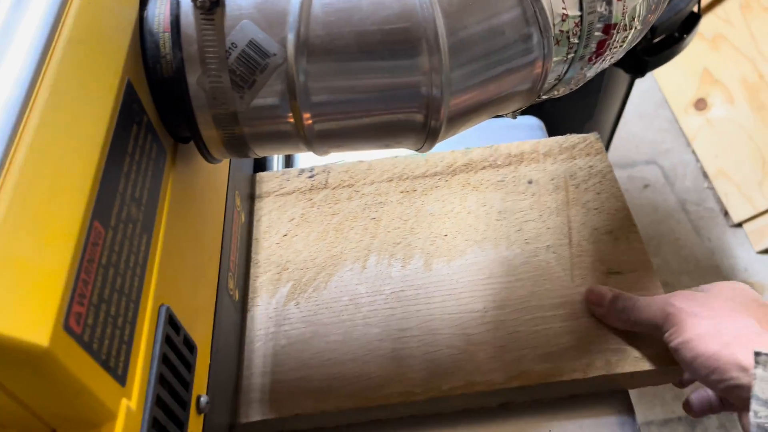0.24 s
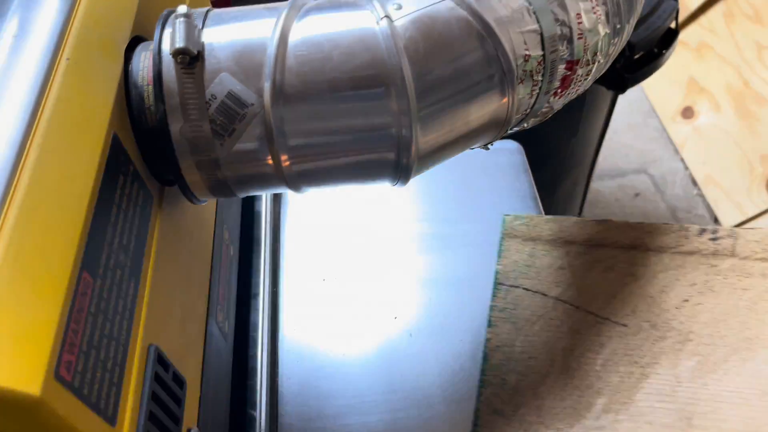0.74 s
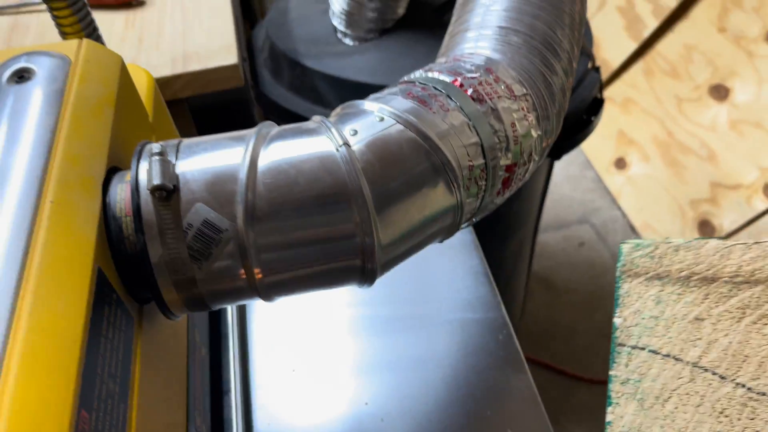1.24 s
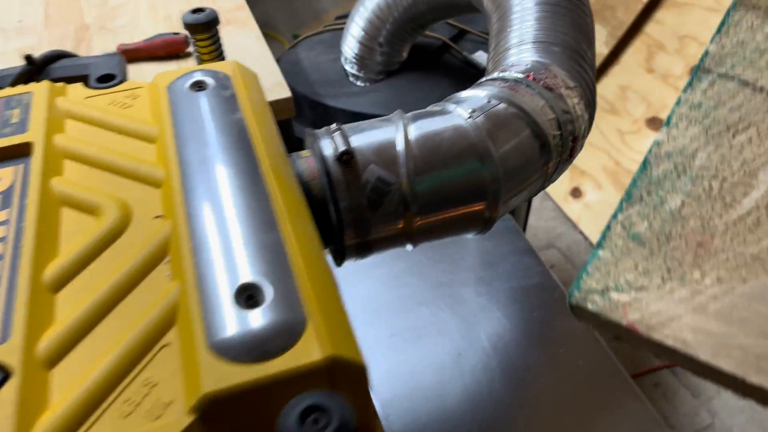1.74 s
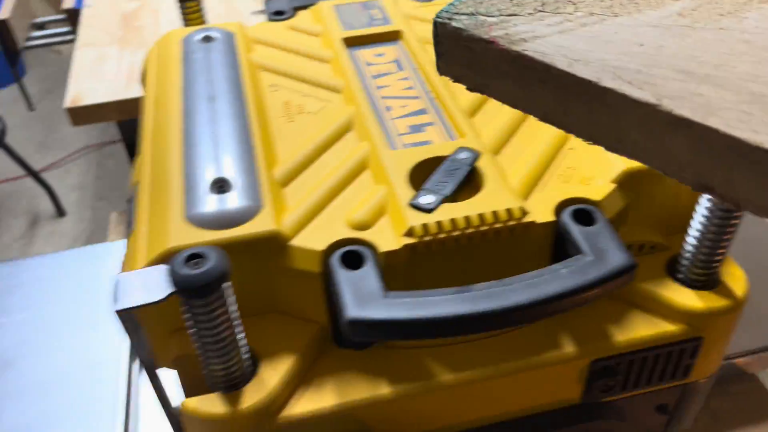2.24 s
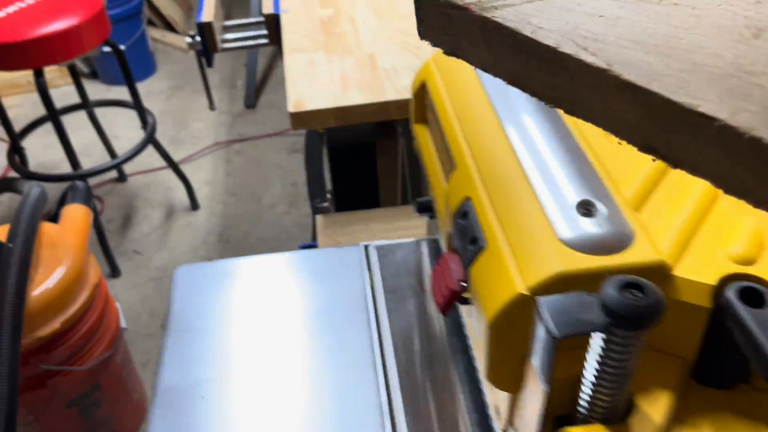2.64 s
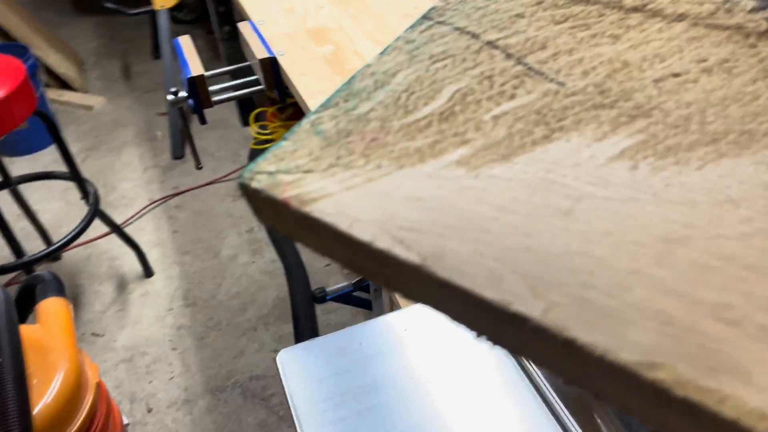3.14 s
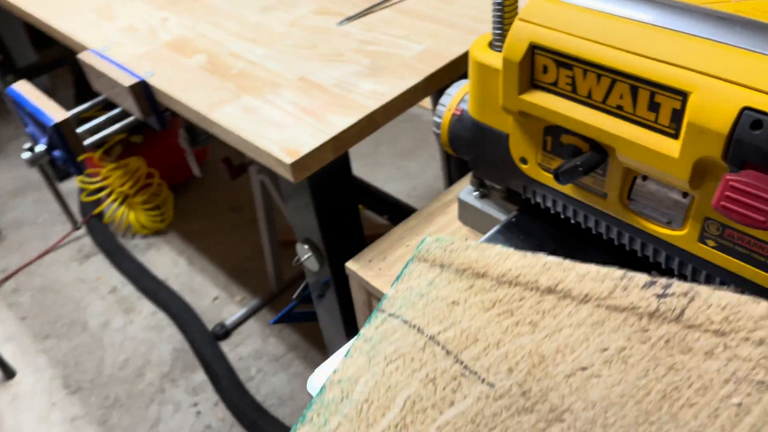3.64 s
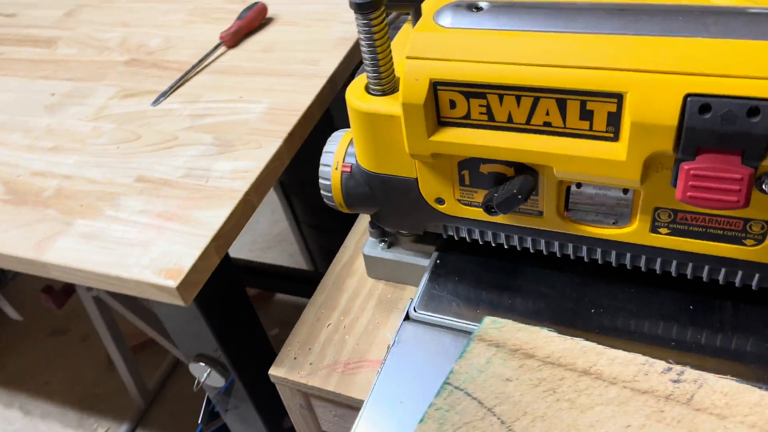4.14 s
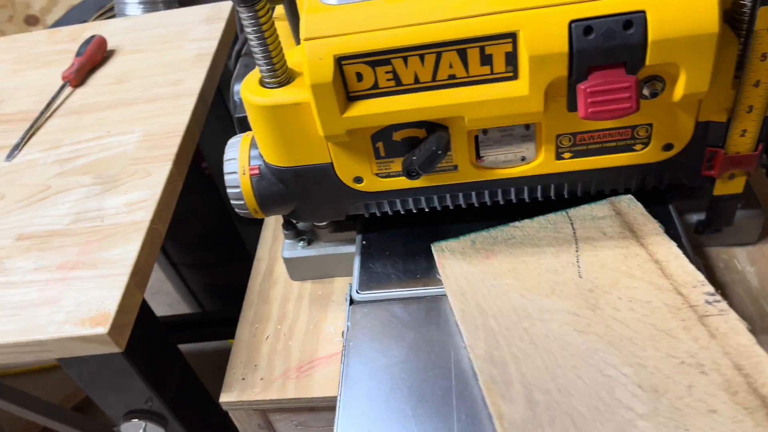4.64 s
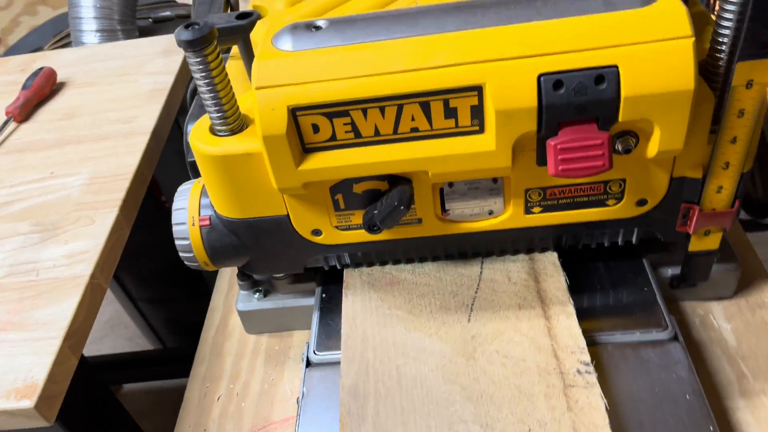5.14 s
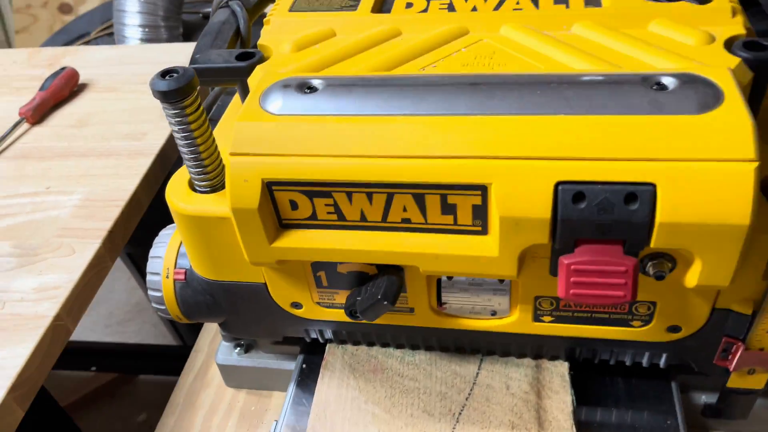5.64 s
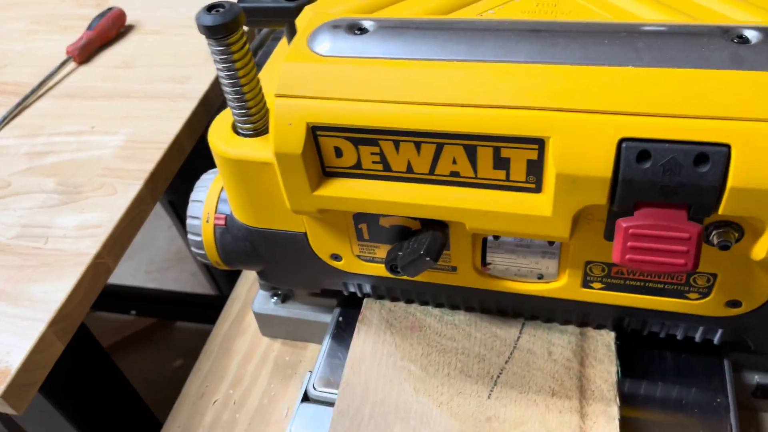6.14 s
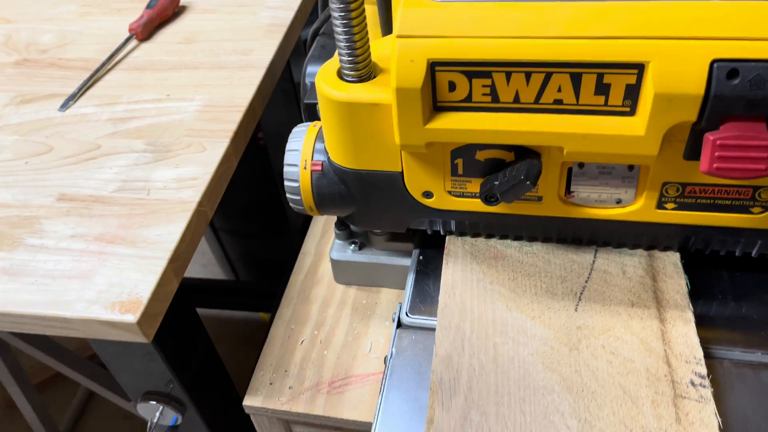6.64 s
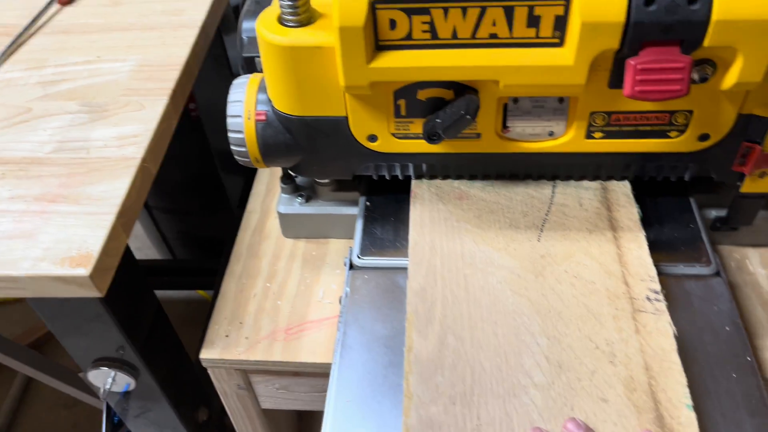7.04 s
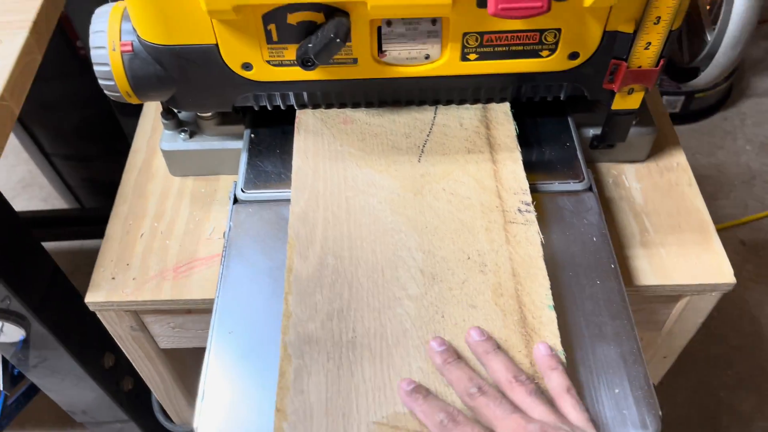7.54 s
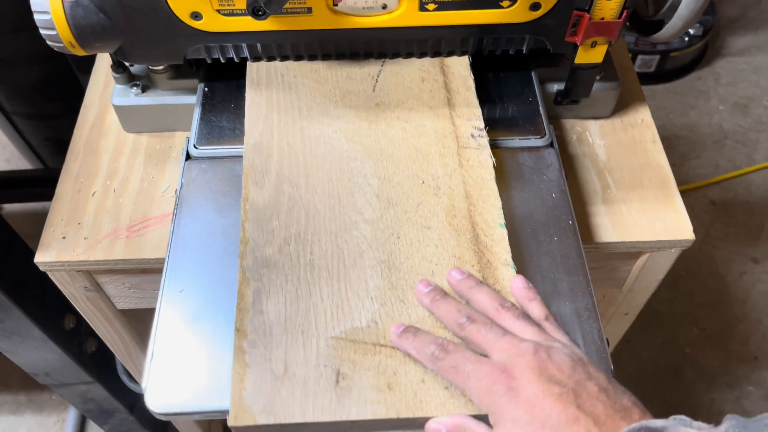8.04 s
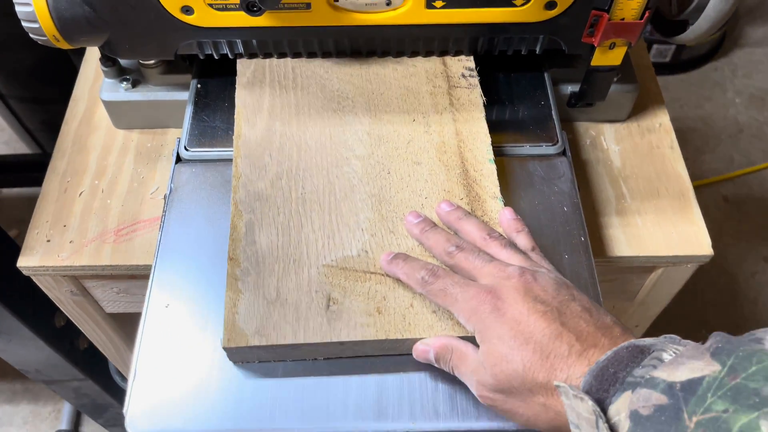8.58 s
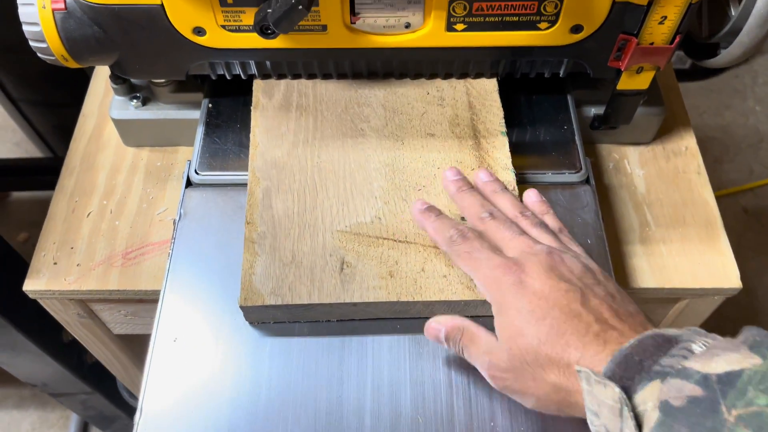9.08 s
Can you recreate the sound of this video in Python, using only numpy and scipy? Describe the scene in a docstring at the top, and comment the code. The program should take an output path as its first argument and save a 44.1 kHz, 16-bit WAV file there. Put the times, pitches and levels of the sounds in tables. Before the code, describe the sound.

A thickness planer is already running at full speed in a workshop, heard close on a moving handheld stereo microphone. From 0 to 1 second, near the metal dust duct, a solid drone near 450 hertz leans left, with full airy blower roar and a thin, very high motor whine. From about 1 to 2.4 seconds the microphone goes round the machine; the drone weakens and wavers, the whine fades and rumble thins. Around 2.5 to 3.7 seconds the hum swells and dips between sides. From 3.8 seconds, at the infeed table, the sound is fuller and slightly louder, with rough beating and shifting resonances in the hiss through 6 seconds. From 6 to 9 it holds steadier, pitch creeping up imperceptibly, with a tiny bright tick near 7.9. At roughly 9.24 the knives touch the board: a rapid, bright, woody rattle begins, cut off at 9.3.

```python
"""In a workshop a thickness planer idles while the microphone walks from the chip duct round to the infeed table.
A brush motor turns a three-knife cutter through a belt: both are sums of sines locked to the shaft angles,
and neighbouring tones beat. Level tables carry the swells and fades of the room's standing waves.
Fan and chip blower are filtered noise; at the very end the knives touch a board, ticks exciting resonators."""
import sys
import numpy as np
from scipy import signal
from scipy.io import wavfile
from scipy.ndimage import uniform_filter1d

SR = 44100
rng = np.random.default_rng(int(sys.argv[2]) if len(sys.argv) > 2 else 0)


def put_to_file(sound):
    """Save the sound as 16-bit audio at rate SR, in the file named by the first command-line argument."""
    columns = np.atleast_2d(sound).T  # one column per channel
    safe = np.clip(columns, -1, 1)
    whole_steps = np.round(safe * 32767)
    wavfile.write(sys.argv[1], SR, whole_steps.astype(np.int16))


N = 410571

# cutter speed, creeping up and sagging as the rollers take the board: t/s, speed/(turns per s)
CUTTER_SPEED = [(0, 149.62), (0.8, 149.99), (1.2, 150.14), (1.65, 150.24), (2.1, 150.17), (2.35, 150.26),
                (2.75, 150.35), (3.3, 150.37), (3.75, 150.56), (4.2, 150.59), (4.95, 150.72), (5.2, 150.84),
                (5.5, 150.88), (6.65, 150.84), (7.05, 150.95), (8.1, 151.06), (8.6, 151.08), (9.05, 150.87),
                (9.31, 150.96)]
BELT_RATIO = 1.95  # motor turns per cutter turn
# phase between the ports, a full turn across the top band: f/Hz, left lead/turns
PORT_PHASE = [(8800, 0), (9750, -.49), (10350, -.51), (11800, -1)]
TOP_BAND_HZ = PORT_PHASE[0][0]


def amp(db):
    """Level to amplitude ratio: 20 dB is a factor of ten."""
    return 10 ** (np.asarray(db) / 20)


def in_time(rows, t):
    """Linear interpolation of a table's columns at times t."""
    s, *columns = np.transpose(rows)
    return [np.interp(t, s, c) for c in columns]


def at_hz(points, hz):
    """Spectrum interpolated along a logarithmic frequency axis."""
    p = np.array(points)
    return np.interp(np.log(hz + 1), np.log(p[:, 0]), p[:, 1])


def bump(x, centre, width):
    """Gaussian of unit height; width is its standard deviation."""
    return np.exp(-.5 * ((x - centre) / width) ** 2)


def smooth_chance(shape, sizes):
    """Correlated random field: white noise averaged twice along each axis, standard deviation 1."""
    field = rng.standard_normal(shape)
    for axis, size in enumerate(sizes):
        for _ in range(2):
            field = uniform_filter1d(field, size, axis=axis)
    return field / field.std()


def walked(places):
    """Piecewise-linear path: a row holds while the microphone lingers at its place and glides between."""
    # chip duct, corner of the machine, infeed table, over the board: arrival t/s, departure t/s
    stops = [(0, 1.07), (2.4, 3.73), (3.8, 5.4), (8.4, 9.31)]
    return [(s, *row) for stop, row in zip(stops, places) for s in stop]


def swell(hz):
    """Standing-wave gain of one tone: it swells where the microphone crosses a crest."""
    # centre t/s, standard deviation/s, tone f/Hz, gain/dB
    crests = [(4.6, 0.19, 2710, 10.5), (2.9, 0.12, 2710, 5), (8.1, 0.39, 2710, 7)]
    t = np.arange(0, N, 100) / SR
    near = [row for row in crests if abs(np.log(row[2] / hz)) < .07]
    gain_db = sum((db * bump(t, s, length) for s, length, _, db in near), 0 * t)
    return np.interp(np.arange(N) / SR, t, amp(gain_db))


def tone(angle, rows, waver_db=0.96, fade_db=0):
    """Sine at two ports, amplitude-modulated by a waver in common and a slower fade at each port."""
    # levels and phase are set every 10 samples, the random modulation every 100
    left_db, right_db, lead = in_time(rows, np.arange(0, N, 10) / SR)
    steps = N // 100 + 2
    waver = waver_db * smooth_chance(steps, [25])
    left_slow, right_slow = [waver + fade_db * smooth_chance(steps, [120]) for port in "lr"]

    def read(slow):
        """Linear interpolation of the modulation at the control instants."""
        return np.interp(np.arange(len(lead)) / 10, np.arange(steps), slow)

    controls = [amp(left_db + read(left_slow)), amp(right_db + read(right_slow)), lead]
    left, right, lead = np.repeat(controls, 10, axis=1)[:, :N]
    angle, lead = np.float32(angle % (2 * np.pi)), np.float32(lead)
    # sqrt(2) makes the levels RMS
    return np.sqrt(2) * np.array([left * np.cos(angle + lead), right * np.cos(angle)])


def shafts():
    """Phase as the integral of frequency: angles of cutter, belt-driven motor and 120 Hz mains buzz."""
    t = np.arange(N) / SR
    cutter = 2 * np.pi * np.cumsum(in_time(CUTTER_SPEED, t)[0]) / SR
    return cutter, BELT_RATIO * cutter, 2 * np.pi * 120 * t


def air_rush(cutter, mains, ripple_db=2.0, comb_db=1.58, flicker_db=1.1, knife_pulse=0.066, brush_pulse=0.021):
    """Turbulence as coloured noise, partly coherent between the ports, shaped as the microphone moves."""
    # base spectrum: f/Hz, level/dB per Hz
    base_spectrum = [(40, -88), (85, -75.5), (160, -68), (225, -63), (300, -64), (770, -60), (1400, -64),
                     (2300, -72.5), (4500, -78.5), (6500, -81), (8700, -86), (9400, -80.5), (11000, -79),
                     (12300, -86.5)]
    # duct and housing resonances, peaks and dips: f/Hz, standard deviation/Hz, gain/dB
    resonances = [(457, 11, 4.5), (550, 33, 2.5), (777, 17, 4), (1125, 29, -3.5), (1560, 51, -2.5),
                  (3040, 23, -2.5), (3370, 96, -3), (4210, 730, 2.5), (7000, 86, -5.5), (7980, 100, 2.5)]
    # bands that brighten for a while: centre t/s, standard deviation/s, f/Hz, standard deviation/Hz, gain/dB
    glints = [(1.0, 0.29, 3750, 320, 5), (4.2, 1.5, 2940, 48, 8), (4.1, 0.18, 4460, 220, 8),
              (4.38, 0.22, 4300, 190, 6), (1.9, 0.74, 2300, 82, 1.5), (5.8, 0.7, 2850, 22, 0),
              (6.3, 0.7, 3660, 70, 2), (4.45, 0.35, 1500, 180, 6.5), (4.7, 2.3, 423, 20, 9.5),
              (5.7, 0.35, 3190, 38, 15), (5.4, 0.8, 812, 7.8, 14.5), (5.6, 0.84, 5180, 160, 4.5),
              (5.36, 0.35, 4255, 36, 10.5), (6.6, 0.4, 4255, 33, 8), (5.76, 0.19, 990, 27, 6),
              (9.5, 2.5, 1487, 25, 8.5), (4.95, 0.03, 45, 30, 9), (0.96, 0.55, 2450, 87, 3.5),
              (0.8, 0.7, 3100, 100, 3), (1.3, 0.45, 2080, 27, 4), (1.15, 0.5, 4694, 35, 7),
              (2.2, 1.1, 6050, 49, 8), (3.8, 0.5, 3230, 35, 5), (4.1, 0.45, 5405, 40, 5),
              (4.05, 0.5, 5728, 40, 6), (8.1, 0.9, 5728, 35, 5), (5.9, 1.2, 4800, 50, 4),
              (7.9, 0.55, 5100, 80, 5), (5.95, 0.4, 2864, 25, 5), (9.3, 0.25, 3000, 130, 6),
              (9.1, 0.3, 2110, 30, 8), (3.54, 0.3, 1100, 300, 2), (7.9, 0.54, 110, 27, 5),
              (7.935, 0.012, 9600, 740, 17)]
    # share of noise power common to both ports: f/Hz, share (0-1)
    coherence = [(60, 1), (250, 0.96), (500, 0.62), (1000, 0.3), (2000, 0.38), (4000, 0.3), (7500, 0.1),
                 (8800, 0.7), (10000, 0.97), (11500, 0.98), (12000, 0.98)]
    # one row a place: level/dB, rumble/dB, body/dB, hiss/dB, left lean/dB, left lead/ms
    rush_places = [(-0.5, 0, 3, 4, 2.5, 0.42), (-0.4, -4, -1, -0.2, 2.5, 0.089),
                   (-0.1, 2.5, 0.3, 1.4, 0.6, 0.072), (0.47, 2.5, -0.9, -0.7, 2, 0.069)]

    hz, t, white = signal.stft(rng.standard_normal((3, N)), SR, nperseg=2048)
    level_db, rumble_db, body_db, hiss_db, lean_db, lead_ms = in_time(walked(rush_places), t)
    f = hz[:, None] + 1
    grid = (len(hz), len(t))
    below_top = f < TOP_BAND_HZ

    db = at_hz(base_spectrum, f) + level_db
    db = db + rumble_db / (1 + (f / 130) ** 4) + hiss_db / (1 + (4000 / f) ** 4)
    db = db + body_db * bump(np.log2(f), 9.62, 0.55)  # octaves: centred near 790 Hz
    db = db + sum(gain_db * bump(f, c, w) for c, w, gain_db in resonances)
    db = db + sum(gain_db * bump(t, s, length) * bump(f, c, w) for s, length, c, w, gain_db in glints)
    db = db + flicker_db * smooth_chance(grid, [20, 2])  # gusts, broad and quick
    db = db + comb_db * smooth_chance(grid, [2, 24]) * below_top  # narrow room peaks common to both ports

    # the delay between the ports acts below 4 kHz
    lead = 2 * np.pi * (at_hz(PORT_PHASE, f) + f * lead_ms / 1000 * (f < 4000))
    alike = np.clip(at_hz(coherence, f), 0, 1)
    ports = []
    for k, side in enumerate([1, -1]):
        # standing waves: a fine, slowly shifting ripple, independent where the ports are incoherent
        ripple = ripple_db * smooth_chance(grid, [3, 30]) * np.sqrt(1 - alike)
        common = np.sqrt(alike) * white[2] * np.exp(.5j * side * lead)
        mixed = common + np.sqrt(1 - alike) * white[k]
        ports.append(mixed * amp(db + ripple + side * lean_db / 2 * below_top))
    # unit-variance noise has density 2/SR, so this scales it to 1 per Hz
    rush = signal.istft(np.array(ports), SR, nperseg=2048)[1][:, :N] * np.sqrt(SR / 2)
    return rush * (1 + knife_pulse * np.cos(3 * cutter) + brush_pulse * np.cos(mains))


def bite(cutter, tear=0.088):
    """Impulse excitation: knives tick the board's end, torn fibres add noise; board and table resonate."""
    # modes of board and table: f/Hz, bandwidth/Hz, relative level/dB
    board_modes = [(2650, 200, 6), (3400, 290, 8), (4980, 110, 3), (6400, 200, -5), (7800, 400, -11),
                   (10900, 460, -9)]
    start_s, rise_s, level_db = 9.236, 0.04, -29

    start = int(start_s * SR)
    ticks = np.diff(np.floor(3 * cutter[start - 1:] / (2 * np.pi)))  # 1 at each knife passage
    strikes = ticks * amp(rng.normal(0, 1.5, len(ticks))) + tear * rng.standard_normal((2, len(ticks)))
    rung = 0
    for hz, width, db in board_modes:
        r = np.exp(-np.pi * width / SR)  # pole radius
        poles = [1, -2 * r * np.cos(2 * np.pi * hz / SR), r * r]
        rung = rung + amp(db) * signal.lfilter([1 - r * r, 0, r * r - 1], poles, strikes)
    rise = np.clip(np.arange(len(ticks)) / SR / rise_s, 0, 1)
    return np.pad(amp(level_db) * rise * rung / rung.std(), ((0, 0), (start, 0)))


def motor(cutter, rotor, mains):
    """Beats and modulation: rotor tones beat with the cutter, and the mains pulse the commutator whine."""
    # beating tones: t/s, left level/dB, right level/dB, left lead/rad, phase ahead of 2, 3, 4 cutter turns/rad
    rotor_beat = [(0.05, -36, -39.7, -0.1, 2.2), (0.25, -38, -41.5, -0.1, 1.6), (0.65, -39, -42, -0.7, 3.4),
                  (1.05, -40, -42.8, -1.2, 4.7), (1.35, -35.5, -46, -0.8, 3.8), (2.4, -32.0, -32, 0.1, 2.9),
                  (2.65, -32, -29, 0.1, 2.7), (2.9, -31.1, -27.0, 0.2, 3.3), (3.5, -36, -30, -0.2, 3.4),
                  (3.8, -32.0, -28.4, -0.1, 4.1), (4.15, -34, -29.5, 0.1, 4.4), (5.0, -32.5, -28, 0.1, 4.5),
                  (5.4, -35, -29.2, 0.1, 4.6), (5.8, -29, -27, 0.2, 4.9), (5.95, -33.8, -28.9, 0.2, 5.3),
                  (6.3, -35.5, -30, 0.2, 4.0), (7.1, -34.1, -30, 0.1, 4.7), (8.0, -33, -30.3, 0.1, 4.2),
                  (8.15, -33, -30.5, 0.2, 4.4), (8.55, -33, -29.8, 0.1, 4.6), (8.7, -37, -33.2, 0.2, 4.7),
                  (9.25, -37, -33.5, 0.2, 4.5)]  # motor turn, against twice the cutter
    knife_beat = [(0.05, -30.1, -36.4, 2.7, 2.2), (0.1, -38.7, -36.5, 1.7, 2.4), (0.3, -43, -41.2, 5, 1.4),
                  (0.45, -33, -33.6, 1, 2.6), (0.75, -46, -43.5, 2.5, 1.9), (1.0, -38.1, -36.5, 1.5, 2.0),
                  (1.65, -38.5, -51.0, 3.0, 2.9), (1.8, -42.7, -41.7, -0.1, 6.3),
                  (1.9, -44.7, -39.1, 1, 5.5), (2.25, -53.0, -39.6, 3.0, 3.8), (2.55, -40, -48.7, 6.2, 4.0),
                  (2.75, -37.8, -43.8, 5, 5.6), (2.95, -31, -33, -0.5, 11.8), (3.2, -33, -48.3, 4.5, 7.1),
                  (3.3, -33.2, -35.6, 6, 5.3), (3.45, -31.6, -28, 7, 5.4), (3.55, -31, -28, 6.2, 5.6),
                  (3.65, -29, -27, 6.5, 5.4), (3.75, -30, -26, 6, 3.4), (3.95, -34, -30.2, 6.5, 2.6),
                  (4.15, -32.6, -27, 6, 2.6), (4.3, -39.2, -33.9, 6.9, 2.2), (4.8, -28, -24, 6.5, 2.5),
                  (4.95, -43.1, -37.0, 7.1, 2.6), (5.2, -32.8, -30.2, 6.5, 3.2),
                  (5.5, -34.6, -33.4, 6.5, 3.4), (5.65, -27, -27, 7, 4.1), (5.7, -26, -24, 6.7, 4.4),
                  (5.8, -33.8, -31.6, 6.5, 3.2), (5.9, -30.6, -30.1, 9, 4.7), (5.95, -28, -27, 5.5, 3.9),
                  (6.05, -35.4, -31, 7.5, 3.6), (6.15, -33.6, -32.2, 7, 5.2), (6.2, -35.9, -36.1, 6.1, 4.4),
                  (6.3, -32.9, -27, 6.4, 3.4), (6.55, -31, -33.4, 6, 3.5), (6.8, -32.5, -29.5, 7.5, 2.6),
                  (7.05, -40, -37, 7.3, 2.5), (7.4, -33.0, -28, 7.1, 2.8), (7.9, -37, -31.5, 7.1, 2.7),
                  (8.6, -41, -38, 6, 3.9), (8.75, -32.2, -30.2, 7.1, 3.6), (9.15, -37.3, -35.5, 7.0, 3.5),
                  (9.25, -30.6, -31.0, 7, 3.6)]  # motor plus cutter turn, against the knife tone
    upper_beat = [(0.05, -37.7, -42.1, 1, 2.0), (0.3, -36.5, -40.7, 0.5, 1.2), (0.6, -36, -44.1, 0.2, 2.9),
                  (1.05, -34.9, -47.2, -0.8, 3.2), (1.45, -35, -38.7, 0.1, 2.8),
                  (1.7, -36.0, -38.6, 0, 2.4), (2.05, -50.7, -45.8, -0.6, 3.3),
                  (2.45, -39.8, -41.4, -2.1, 2.9), (2.85, -37.8, -40.9, 0.4, 1.8),
                  (3.15, -39.0, -38.6, 1.2, 2.3), (3.5, -57.3, -43.5, 1, 1.7),
                  (3.95, -42.9, -44.0, 1.4, 3.1), (4.15, -41.7, -44.3, 1.3, 2.1),
                  (5.25, -46.1, -49.1, 1.6, 3.2), (5.55, -43.0, -41.2, 2.5, 2.3),
                  (5.7, -58.5, -53.4, 2.3, 4.3), (5.95, -48.7, -48.1, 2.3, 3.3),
                  (6.2, -48.7, -41.7, 2.7, 1.2), (6.75, -48.4, -46.5, 2.0, 3.1),
                  (7.6, -47.2, -47.3, 2.3, 1.7), (8.25, -41.2, -41.8, 2, 2.4), (9.25, -46.1, -54.0, 2, 2.8)]  # motor plus two cutter turns, against the fourth multiple
    # single tones: t/s, left level/dB, right level/dB, left lead/rad
    gear_hum = [(0.05, -47, -46, 0.7), (1.1, -51, -51, 0.8), (3.15, -45.6, -38, 0.1),
                (3.45, -51.8, -44.7, -0.1), (5.4, -49.6, -43.0, -0.1), (5.9, -62.5, -52.9, 0.7),
                (6.3, -53.4, -44.3, 0.1), (9.25, -62.2, -51, 0.7)]  # faint, just above twice the cutter, perhaps a feed-drive gear
    gear_order = 2.092  # cutter multiple
    fan_whine = [(0.0, -48, -53.5, 1.0), (0.35, -47, -57.0, 1.1), (0.5, -52, -62.0, 1.3),
                 (0.9, -51, -57, 2.9), (1.1, -44, -50, 4.1), (1.5, -54.0, -55, 4), (1.65, -46.5, -58, 6.9),
                 (1.85, -61, -64, 6.4), (2.05, -48, -46, 6.7), (2.15, -64, -64, 6.7),
                 (2.3, -53.0, -56.5, 6.8), (2.5, -64.0, -60, 6.8), (2.6, -44, -61.5, 6.8),
                 (2.7, -46, -61.5, 7.9), (3.1, -60, -67.5, 7.1), (3.4, -47, -57.5, 7.9),
                 (3.55, -60.5, -65.5, 7.9), (3.75, -51.0, -53.5, 7.7), (4.45, -55, -68.0, 7.1),
                 (4.9, -56.0, -61.5, 7.1), (5.0, -70, -68.0, 8), (5.4, -48, -56.5, 7.3),
                 (5.55, -67.0, -65.5, 7.7), (5.9, -45, -59, 7.7), (6.6, -62.0, -68.0, 8.6),
                 (6.75, -49, -68.0, 9.0), (7.1, -53, -56.0, 9.0), (7.25, -46, -65.0, 8.9),
                 (7.5, -54, -67.5, 8.8), (7.75, -57.5, -58.0, 9.9), (8.0, -47.5, -65.5, 8.9),
                 (8.3, -50, -68.0, 9.3), (8.5, -48, -55.0, 9), (9.3, -54, -66, 13)]
    brush_whine = [(0, -37, -38, -1.5), (.95, -38.5, -39.5, -1.8), (1.35, -44, -45, -1.9),
                   (1.55, -41, -41.5, -2), (1.9, -49, -50, -1.8), (2.6, -55, -55, -2), (4, -57, -62, -1.9),
                   (7, -62, -62, -2.5), (8.4, -56, -54, -2), (9.3, -57, -59, -3.5)]
    # rotor multiples that accompany the commutator whine, and their levels relative to it/dB
    rotor_orders, rotor_orders_db = [16, 28, 29, 31, 33, 35, 36, 38, 39, 40], [-16.5, -24, -27.5, -22, -22, -17, -13, -20, -15,
                                                           -25]
    # faint mixing tones and rotor multiples: cutter multiple, motor multiple, mains buzz multiple; level/dB
    mixes, mixes_db = [(0, 0, 1), (1, 0, 1), (0, 1, -1), (2, 0, -1), (0, 2, 0), (2, 0, 1), (0, 8, 0),
                       (0, 7, 0), (0, 3, 0), (3, 1, 0), (3, -1, 0), (0, 16, 0), (0, 16, 1), (0, 16, -1),
                       (0, 9, 0), (0, 5, 0), (0, 14, 0), (0, 15, 0), (21, 0, 0), (10, 0, 0), (0, 23, 0),
                       (3, 21, 0), (0, 33, 0), (0, 34, 0), (0, 35, 0), (0, 36, 0)], [-53, -46, -55.5, -54, -47.5, -46.5, -56, -65, -57, -47, -60.5, -59.5,
                                      -67, -69, -70, -57.5, -65, -63, -65, -53.5, -69.5, -68, -68, -70, -75,
                                      -66]
    sideband_db = -10.5

    t = np.arange(N) / SR
    cutter_hz = CUTTER_SPEED[0][1]
    out = tone(gear_order * cutter, gear_hum, waver_db=1.0)
    for turns, rows, waver_db in [(0, rotor_beat, 0.0), (1, knife_beat, 0.3), (2, upper_beat, 0.96)]:
        ahead = in_time(rows, t)[-1]
        out += tone(rotor + turns * cutter + ahead, [row[:-1] for row in rows], waver_db=waver_db)
    out += tone(21 * rotor, fan_whine, waver_db=2.5)  # 21 fan blades

    whine = tone(32 * rotor, brush_whine, waver_db=1.5)  # 32 commutator bars
    for k, db in zip(rotor_orders, rotor_orders_db):
        lead = 2 * np.pi * at_hz(PORT_PHASE, k * BELT_RATIO * cutter_hz)
        rows = [(s, left, right, lead) for s, left, right, _ in brush_whine]
        whine += amp(db) * tone(k * rotor, rows, waver_db=3.5)
    out += whine * (1 + 2 * amp(sideband_db) * np.cos(mains))  # sidebands one mains buzz away

    for (c, m, b), db in zip(mixes, mixes_db):
        # only high rotor multiples are out of phase between the ports
        lead = 2 * np.pi * at_hz(PORT_PHASE, (c + m * BELT_RATIO) * cutter_hz) * (m > 30)
        angle = c * cutter + m * rotor + b * mains + rng.uniform(0, 2 * np.pi)
        out += tone(angle, [(0, db, db, lead)], waver_db=3.5, fade_db=2.0)
    return out


def cutterhead(cutter):
    """Harmonic series: three knives chop the air, and unbalance adds the multiples of one turn."""
    # all along the walk: t/s, left level/dB, right level/dB, left lead/rad
    # the knife tone and its next four multiples
    knife_tones = [[(0.05, -17, -29, 2.5), (0.1, -15.7, -34.0, 2.7), (0.15, -15.5, -35.7, 2.1),
                    (0.2, -15, -35.0, 1.9), (0.35, -14.5, -31, 2.1), (0.4, -15, -30, 2.7),
                    (0.45, -16, -28, 2.5), (0.65, -18.5, -26.0, 2.5), (0.75, -16.5, -25, 3),
                    (0.9, -18.9, -24.2, 2.5), (1.25, -22.0, -30, 3.3), (1.4, -21.5, -31, 4.0),
                    (1.6, -22, -25.5, 4.5), (1.75, -23, -28.0, 4.4), (2.05, -22.5, -32.2, 2),
                    (2.3, -28, -26.5, 0), (2.6, -21, -21, -0.9), (2.85, -25.5, -18, 0.5),
                    (3.05, -28, -28, 3), (3.3, -20, -22.5, 3), (3.55, -18.5, -35.4, 3),
                    (3.6, -19, -38.6, 3.5), (3.7, -17, -38.6, 2.4), (3.75, -18.1, -38.1, 1.0),
                    (3.8, -17, -32.6, 0.7), (4.0, -18.1, -22.6, 0.5), (4.15, -17.5, -18, 0.8),
                    (4.35, -18, -18, 1.0), (4.8, -17, -17, 0.77), (5.0, -20, -20, 1.2),
                    (5.25, -18.9, -19.5, 1.0), (5.5, -18, -19.5, 1.5), (5.6, -23, -21.3, 2.2),
                    (5.75, -26, -19, 1.3), (5.8, -22, -16, 1.3), (5.9, -19, -19.5, 1.74),
                    (6.05, -28, -16.5, 1), (6.15, -16, -19.5, 1.6), (6.2, -18.9, -23, 2),
                    (6.3, -18.7, -20, 1.5), (6.6, -17, -20, 1.47), (7.1, -23, -18.8, 1.4),
                    (7.65, -18.5, -19.5, 1.0), (8.15, -21.0, -21.0, 1.23), (8.75, -18.5, -17.8, 1.0),
                    (9.25, -18.1, -20.7, 1.0)], [(0.05, -30.5, -31, 3.5), (0.55, -27.5, -27.5, 1.83),
                                    (1.1, -25.5, -30, 2.5), (1.45, -31.3, -38, 1.8), (1.65, -33.5, -42, -3),
                                    (1.8, -27.5, -35, -3.5), (2.1, -36, -45, -7), (2.15, -38, -51.6, -10.2),
                                    (2.35, -31, -33.2, -9.5), (2.65, -34.9, -41, -9), (3.0, -37, -31, -12),
                                    (3.3, -31, -30, -12), (3.5, -32, -37, -8.5), (3.7, -27.0, -28.9, -9.5),
                                    (4.0, -26, -27.2, -9.1), (4.15, -24.8, -37.4, -9),
                                    (4.25, -24.5, -37.7, -5.5), (4.4, -25.5, -27, -6.0),
                                    (4.95, -26.5, -30, -5.5), (5.25, -26.5, -32.8, -6.7),
                                    (5.5, -30, -28, -8.5), (5.85, -47, -39, -9.5), (6.4, -29, -33, -8.5),
                                    (6.75, -26.5, -31.9, -5.5), (7.15, -26.2, -28, -5),
                                    (7.5, -26.5, -34, -5), (7.95, -27.3, -37, -5), (8.7, -23, -41, -3.5),
                                    (9.1, -26.5, -38, -3.8), (9.25, -24.5, -42.1, -2)], [(0.05, -33.3, -49.0, 4), (0.2, -37, -50.9, 6),
                                                      (0.3, -33, -54, 4), (0.6, -42, -38, 5),
                                                      (1.3, -43, -48, -0.5), (1.5, -35.9, -50.0, 1.5),
                                                      (1.65, -39, -38.1, 1.3), (1.9, -45.0, -46.7, 0.5),
                                                      (2.1, -39, -40.7, -8.9), (2.2, -35, -45.2, -8.5),
                                                      (2.25, -37.3, -48.5, -7.5), (2.3, -36, -52.9, -6.5),
                                                      (2.75, -36, -38.9, -4), (3.0, -41.7, -34, -2),
                                                      (3.35, -30.5, -40, -2.2), (3.45, -30.5, -40.9, -1.7),
                                                      (3.9, -51.3, -51, -2), (4.0, -35, -33, -0.5),
                                                      (4.2, -30.9, -33, -1.3), (4.3, -33, -37.8, -0.8),
                                                      (4.45, -29.1, -31, -0.3), (4.8, -32.5, -34, -0.5),
                                                      (5.3, -28, -34.0, -0.5), (5.55, -29, -34, -1.2),
                                                      (5.95, -43, -32.1, -1.1), (6.4, -32, -33, -1.5),
                                                      (6.6, -30.3, -32, -0.8), (6.9, -34, -31.4, -0.7),
                                                      (7.5, -30.5, -34.4, -0.0), (8.25, -30, -33, -0.3),
                                                      (8.7, -24.5, -29.6, -0.7), (9.25, -31.9, -30, 0.3)], [(0.05, -39.1, -45.3, 1.6),
                                                                        (0.45, -41, -57.1, 3.9),
                                                                        (0.5, -37, -57.1, 1.6),
                                                                        (0.55, -36.9, -49.1, 2),
                                                                        (0.95, -38.4, -37, 1.5),
                                                                        (1.1, -34.6, -43, 2),
                                                                        (1.4, -37.5, -39, 1.3),
                                                                        (1.55, -39, -38.0, 3),
                                                                        (1.7, -40.4, -39.4, 2.0),
                                                                        (1.8, -46, -47, -0.5),
                                                                        (1.95, -37, -48.0, -1.2),
                                                                        (2.25, -49.4, -41.3, -10),
                                                                        (2.35, -37, -53.3, -10.9),
                                                                        (2.4, -38.5, -57.1, -8.5),
                                                                        (2.8, -54.5, -45, -8),
                                                                        (3.0, -35, -43.6, -7),
                                                                        (3.15, -42.0, -47.0, -7.5),
                                                                        (3.55, -47.4, -42, -9.5),
                                                                        (4.5, -38, -36.2, -7),
                                                                        (4.75, -41.0, -55, -6.3),
                                                                        (4.8, -45, -55.3, -3.3),
                                                                        (5.15, -43, -38.5, -1.7),
                                                                        (6.15, -39, -35, -1.5),
                                                                        (6.7, -39, -38.0, -1.7),
                                                                        (7.5, -38.5, -43, -0.3),
                                                                        (8.05, -47.5, -44, -3),
                                                                        (8.35, -37, -36, -0.5),
                                                                        (8.45, -36, -36.2, -0.1),
                                                                        (8.95, -33.5, -41.6, -0.3),
                                                                        (9.05, -35, -46.2, 0.6),
                                                                        (9.2, -30.4, -38.2, -0.6),
                                                                        (9.25, -31, -38.1, 0.5)], [(0.05, -63.4, -50.5, 3),
                                                                                          (0.85, -47, -40.5, 3),
                                                                                          (1.65, -49.3, -46, 1.2),
                                                                                          (1.75, -50.6, -50.8, -1.2),
                                                                                          (2.1, -46.8, -53.7, 5.1),
                                                                                          (2.25, -46.2, -53.9, 1.1),
                                                                                          (2.5, -46.7, -45.6, 2.6),
                                                                                          (2.7, -48.0, -43, -0.3),
                                                                                          (2.9, -51.4, -47.8, -3.3),
                                                                                          (3.1, -51.9, -57.7, -1.6),
                                                                                          (3.15, -46.0, -53.3, 0),
                                                                                          (3.25, -43.5, -42, 1.1),
                                                                                          (3.45, -52, -49, -0.1),
                                                                                          (4.1, -41, -47.7, -1.6),
                                                                                          (4.5, -44.1, -37, 0.5),
                                                                                          (4.95, -48.1, -46, 0.1),
                                                                                          (5.3, -55.1, -62.8, 5.1),
                                                                                          (5.55, -44.5, -47.6, 6),
                                                                                          (5.9, -42.6, -56.0, 3.4),
                                                                                          (6.3, -43, -58.3, 5.8),
                                                                                          (6.95, -52.7, -48.0, 8.7),
                                                                                          (8.05, -43.7, -50.8, 9.9),
                                                                                          (8.15, -47.0, -61.5, 10.2),
                                                                                          (8.2, -47.5, -56.3, 12.7),
                                                                                          (8.3, -46.0, -44.9, 13.1),
                                                                                          (8.8, -52, -49.7, 13.6),
                                                                                          (9.15, -37, -40.1, 13.0),
                                                                                          (9.25, -44, -42, 13.4)]]
    # second, fourth and fifth cutter multiples
    cutter_second, cutter_fourth, cutter_fifth = [(0.05, -37.8, -45, -0.4), (0.15, -41.9, -43.2, -0.8),
                                                  (0.3, -37.8, -37.5, -0.3), (0.85, -39, -39.9, -0.4),
                                                  (1.1, -35.0, -36.8, -0.017), (2.35, -37, -35, -0.17),
                                                  (3.05, -36.7, -31, -0.1), (3.65, -40, -36.6, -1.0),
                                                  (4.3, -37, -36, -0.7), (5.0, -38.8, -39, -0.69),
                                                  (5.4, -35.4, -34.1, -0.6), (5.75, -45.7, -38.8, -0.5),
                                                  (5.9, -38.0, -34.0, -0.4), (6.05, -42.9, -38, -0.2),
                                                  (6.35, -36.0, -32.6, -0.7), (6.8, -37.3, -37.7, -0.9),
                                                  (7.45, -35.9, -37, -0.6), (9.25, -38.2, -35.0, -0.6)], [(0.05, -36.1, -41.0, 0.5),
                                                                    (0.35, -39.5, -44.5, 0.1),
                                                                    (0.6, -34, -41.3, 0.9),
                                                                    (1.1, -31.5, -37.5, 0.6),
                                                                    (1.4, -31.1, -34.3, 0.9),
                                                                    (1.6, -31, -34, 1.3),
                                                                    (2.0, -37, -42.8, 3.7),
                                                                    (2.25, -37.4, -37.1, 6.6),
                                                                    (2.6, -44, -38, 7.5),
                                                                    (3.0, -34.0, -37.6, 7.3),
                                                                    (3.15, -36.1, -36, 7.4),
                                                                    (3.4, -54.3, -35.9, 6.7),
                                                                    (4.1, -40, -45.3, 4.0),
                                                                    (4.35, -55.6, -39.2, 5.4),
                                                                    (4.75, -45.3, -37.6, 4.9),
                                                                    (5.25, -44.7, -38.6, 2.2),
                                                                    (5.65, -58.5, -53.6, 1.7),
                                                                    (5.8, -44.0, -43.8, 0.2),
                                                                    (6.05, -52.8, -45.6, 0.5),
                                                                    (6.25, -39, -38.1, 1.5),
                                                                    (6.95, -41.0, -40.4, 3.8),
                                                                    (8.1, -52.2, -44, 4.5),
                                                                    (8.35, -45.0, -39.8, 2.8),
                                                                    (9.25, -41, -40, 2.7)], [(0.0, -48, -43, 2),
                                                                                      (1.55, -44, -38, 2.5),
                                                                                      (1.85, -52.0, -48, 4),
                                                                                      (2.15, -39, -39, -0.3),
                                                                                      (2.45, -32.5, -45, 0.4),
                                                                                      (3.1, -50, -47, -5.5),
                                                                                      (3.25, -38, -44, -1.5),
                                                                                      (3.65, -41, -29, 0.8),
                                                                                      (4.35, -37, -40, 3),
                                                                                      (4.7, -38.0, -50.5, 0),
                                                                                      (5.0, -37, -52.0, 0),
                                                                                      (5.1, -46, -52.0, 7),
                                                                                      (5.6, -46, -50, 5),
                                                                                      (6.45, -47, -37, 10),
                                                                                      (7.0, -32, -37, 9.5),
                                                                                      (7.65, -62, -48.0, 10.5),
                                                                                      (9.0, -39, -37, 13.1),
                                                                                      (9.3, -45.0, -45, 8)]
    # fainter cutter multiples; for each, one row a place: left level/dB, right level/dB, left lead/rad
    faint_orders, faint_places = [1, 8, 18], [
        [(-33.5, -34, 0.4), (-38.5, -37, 0.24), (-37.5, -35, 0.039), (-36.5, -35, 0.057)],
        [(-43, -52, 3), (-49, -41, 4.2), (-53, -57, 7.2), (-37.5, -44, 8)],
        [(-60, -59, 1.5), (-54, -52, 2.4), (-60, -52, 6.4), (-49.5, -68, 5.1)],
    ]
    fade_db_per_octave, fade_from_hz = 0.82, 110  # standing waves vary a tone more the shorter its wave

    def spread(k):
        """Phase dispersion in the housing: the multiples do not add up to a sharp pulse."""
        return k * cutter + np.pi * (k // 4) ** 2 / 3

    out = sum(tone(spread(3 * k), rows, waver_db=0.9) for k, rows in enumerate(knife_tones, 1))
    out += tone(spread(2), cutter_second) + tone(spread(4), cutter_fourth) + tone(spread(5), cutter_fifth)
    for k, places in zip(faint_orders, faint_places):
        hz = k * CUTTER_SPEED[-1][1]
        fade_db = fade_db_per_octave * np.log2(hz / fade_from_hz)
        out += swell(hz) * tone(spread(k), walked(places), fade_db=fade_db)
    return out


def scene():
    """Superposition of air, the first touch of the board, motor and cutter."""
    cutter, rotor, mains = shafts()
    return air_rush(cutter, mains) + bite(cutter) + motor(cutter, rotor, mains) + cutterhead(cutter)


def record(dry):
    """Band limitation: the microphones drop the deep bass below 81 Hz, the top is cut at 13.4 kHz."""
    dry = signal.sosfilt(signal.butter(2, 81, "high", fs=SR, output="sos"), dry)
    return signal.sosfilt(signal.cheby2(14, 70, 13400, fs=SR, output="sos"), dry)


dry = scene()
out = record(dry)
put_to_file(out)
```